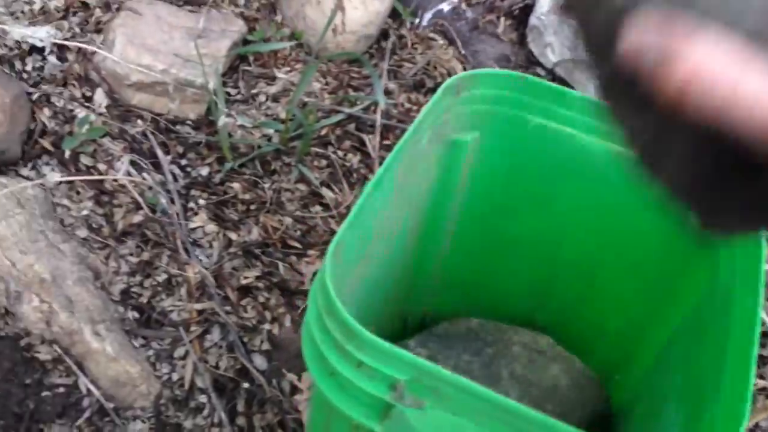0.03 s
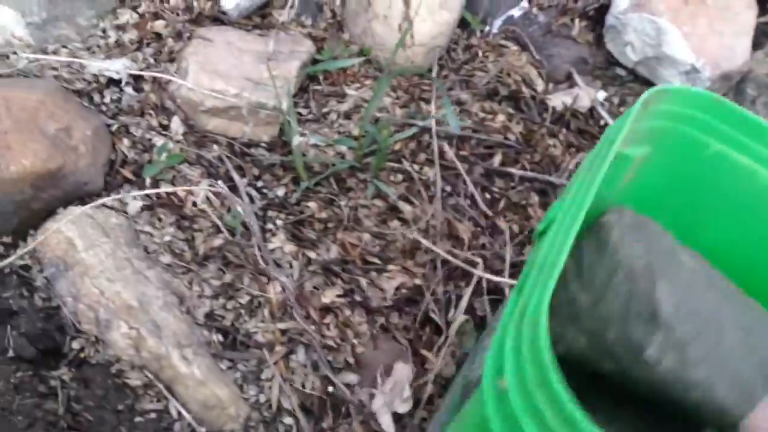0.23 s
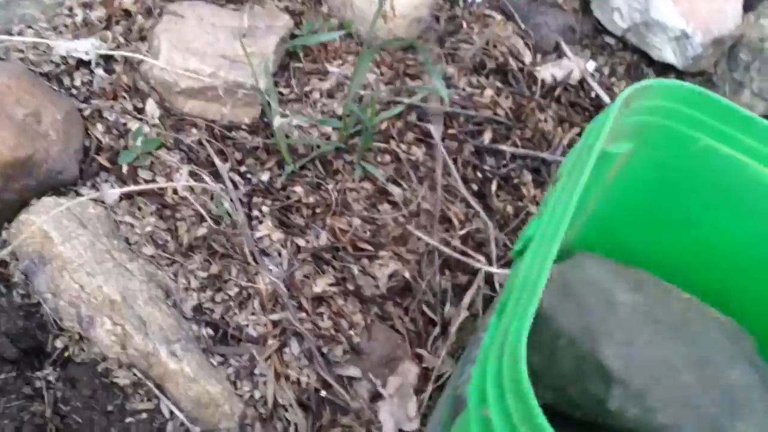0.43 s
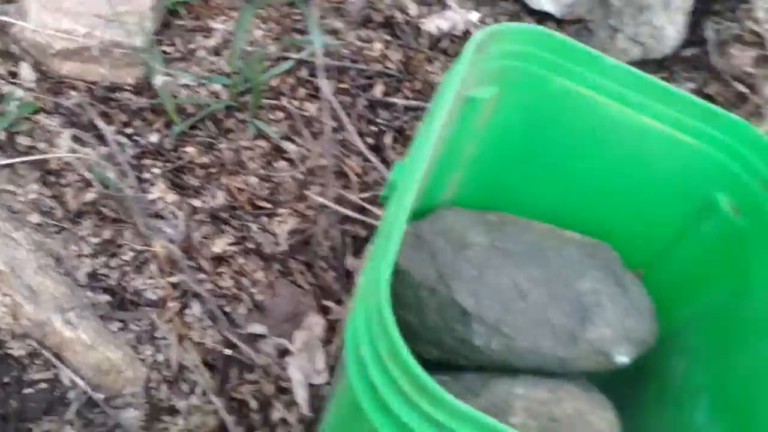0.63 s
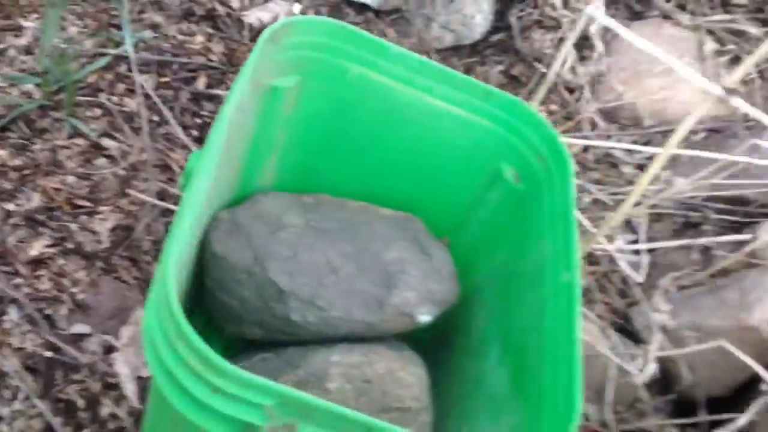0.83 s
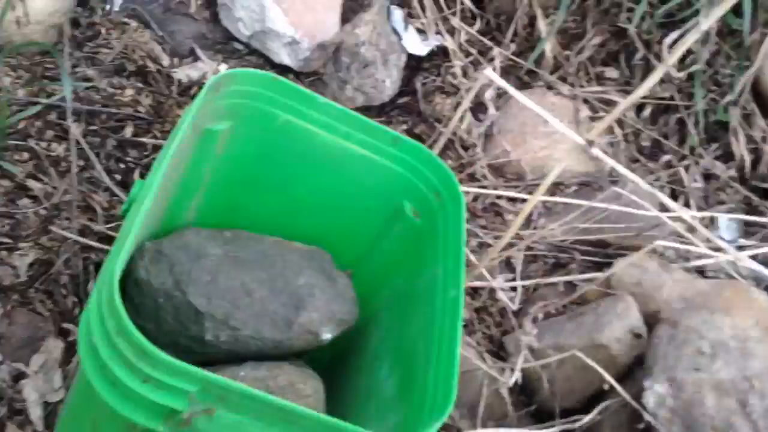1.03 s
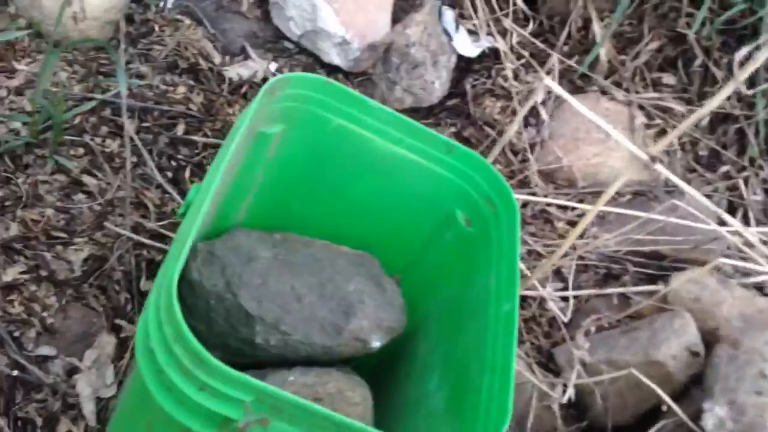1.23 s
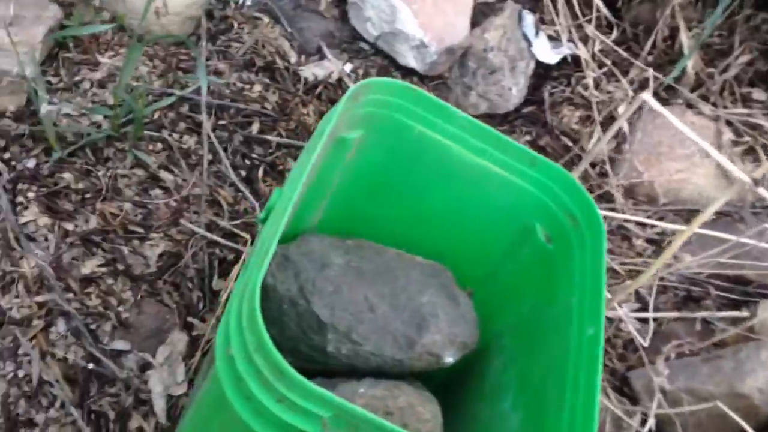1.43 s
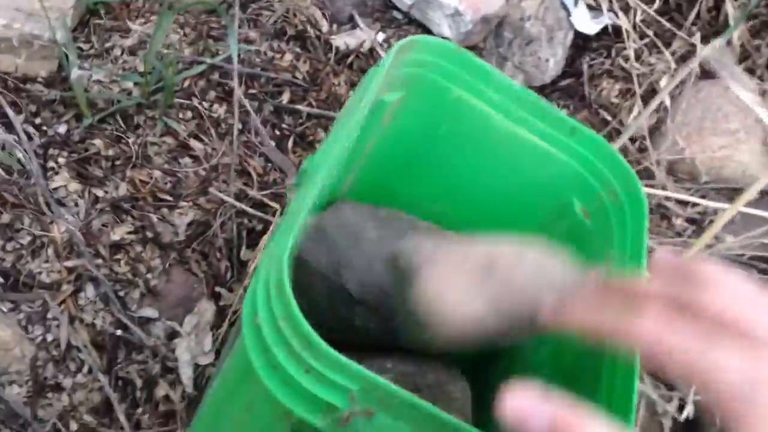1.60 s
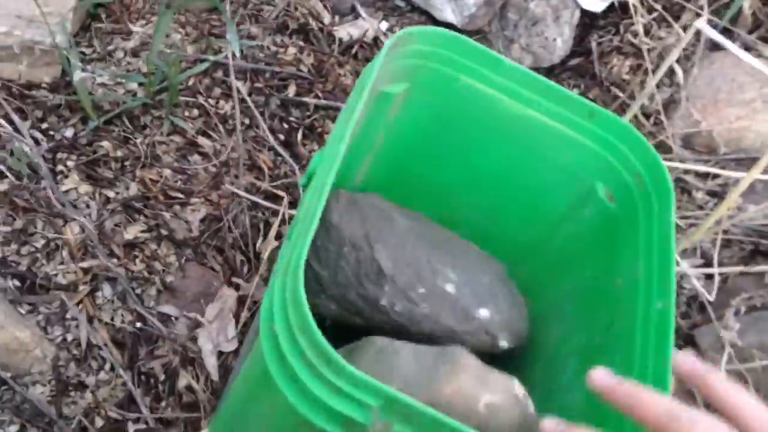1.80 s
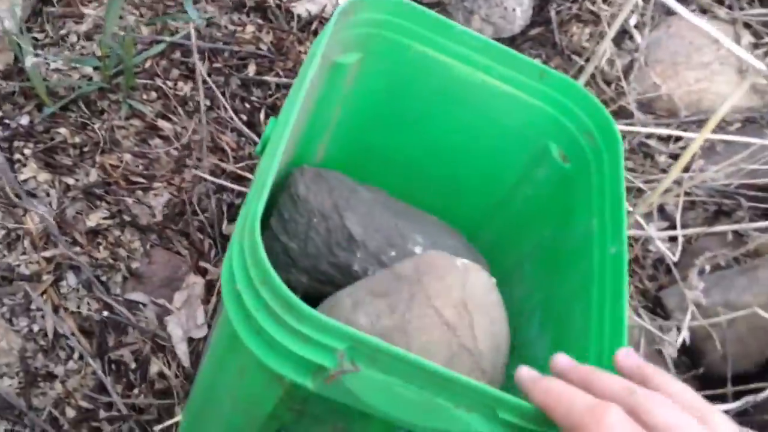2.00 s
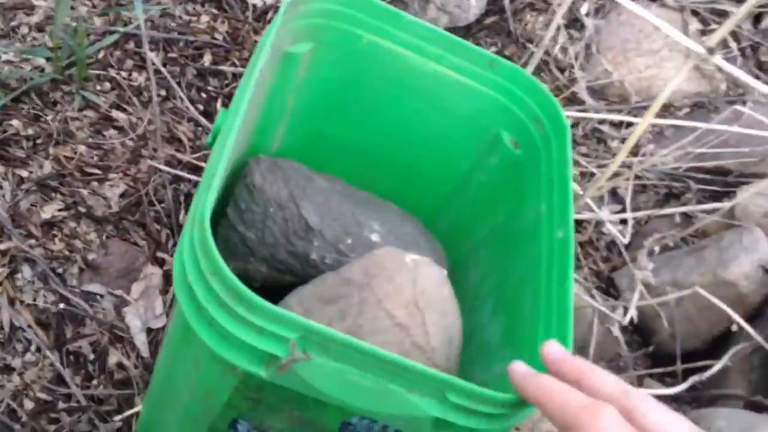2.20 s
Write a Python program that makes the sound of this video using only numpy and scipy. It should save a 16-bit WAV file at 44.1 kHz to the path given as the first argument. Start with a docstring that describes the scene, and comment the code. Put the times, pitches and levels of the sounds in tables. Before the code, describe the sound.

Two large rocks drop into a plastic bin one after the other. Each lands with hollow thumps, scrapes down the wall and clacks against other stones before settling. The sound is close, in quiet outdoor air.

```python
"""Two rocks into a plastic bin.

Two large rocks drop, one after the other, into a bin on leafy ground. Each lands with a cluster of
knocks, grinds down the wall, clacks against the other stones and settles. The hollow bin booms and
its walls ring; behind it is quiet outdoor air with a low rumble."""
import sys
import numpy as np
from scipy import signal
from scipy.fft import rfft, irfft
from scipy.io import wavfile

SR = 44100
rng = np.random.default_rng(int(sys.argv[2]) if len(sys.argv) > 2 else 0)


def to_wav(sig):
    """Store sig (one row per channel, or 1-D mono) as 16-bit WAV at the path in sys.argv[1].

    Samples outside -1..1 are clipped; the rate is SR.
    """
    pcm = np.clip(np.atleast_2d(sig), -1, 1) * 32767
    pcm = np.round(pcm).astype(np.int16)
    wavfile.write(sys.argv[1], SR, pcm.T)  # frames by channels


N = 103635
TIME_S = np.arange(N) / SR
HIT_S = np.arange(SR // 4) / SR  # time within one hit

# Outdoor air. Each row: frequency in Hz, relative spectral density in dB.
AIR_SPECTRUM = [(20, -11), (35, -15.5), (48, -10), (63, 2), (85, -7), (130, -15), (200, -23), (330, -22),
                (550, -20.5), (800, -29.5), (1300, -32.5), (2100, -31), (3000, -36), (8000, -38),
                (15000, -43)]
# Low rumble of the air. Each row: time in seconds, gain in dB.
AIR_SWELL = [(0, 3), (.12, -2), (.5, 0), (1.0, 1), (1.3, 2.5), (1.65, 1.5), (2.2, -5.5), (2.35, 0)]
# Rock swung over the bin. Each row: time in seconds, level in dB.
RUSTLE_LEVELS = [(0, -81), (.06, -63.5), (.13, -57), (0.198, -54.5), (0.262, -78.5), (1.45, -78),
                 (1.58, -62), (1.626, -47.5), (1.655, -61), (1.70, -62.5), (1.75, -85)]
# Dry rustle. Each row: frequency in Hz, gain in dB.
RUSTLE_SPECTRUM = [(200, -26), (1000, -9.5), (3000, -8), (7000, 0.5), (10000, 0.5), (13000, -3.5),
                   (16000, -7)]
# Rock contacts. Each row: start in seconds, hollow boom in dB, wall knock in dB, knock pitch in Hz,
# stone crack in dB, gritty tick in dB.
CONTACTS = [ (.068, -80, -88, 1000, -69, -54), (.193, -45, -42, 900, -65, -54),
            (0.2039, -30.5, -30.5, 600, -76, -88), (0.2165, -15, -14.5, 1047, -34.5, -24),
            (0.224, -26.5, -23.5, 996, -30, -30), (.235, -18, -16.5, 1400, -20, -38),
            (0.243, -20.5, -23.5, 1170, -55, -42.5), (0.2488, -19, -17, 1300, -29.5, -43),
            (.259, -15.5, -15.5, 1100, -29.5, -38), (0.2642, -18.5, -17, 1600, -28, -30.5),
            (0.271, -57, -20, 1300, -46.5, -44), (.280, -21.5, -19, 1600, -40.5, -51.5),
            (0.305, -33, -48, 1500, -46, -41), (.331, -44.5, -39, 1150, -61, -64),
            (.358, -31, -33.5, 1940, -40.5, -37.5), (.369, -30.5, -36.5, 980, -40, -60),
            (0.3763, -44, -37, 790, -38.5, -57), (.427, -34, -37, 1100, -37.5, -40),
            (0.46, -39.5, -44, 800, -41.5, -53), (.509, -54, -30, 1050, -48.5, -48),
            (0.521, -35.5, -30, 1040, -47, -46), (.555, -28.5, -34.5, 855, -45, -56),
            (.564, -29.5, -28, 969, -36, -43), (0.579, -29, -42, 1374, -36, -38.5),
            (0.587, -29, -59, 902, -52, -55), (0.596, -36, -59, 890, -49.5, -59),
            (0.602, -54, -61, 1500, -28, -27.5), (0.6044, -36.5, -27.5, 1700, -44.5, -26),
            (.622, -35.5, -38, 1000, -38.5, -50.5), (0.635, -38.5, -42.5, 990, -46, -46),
            (0.647, -44, -34.5, 1300, -36.5, -34.5), (0.691, -48, -47.5, 900, -50.5, -46.5),
            (0.7536, -53, -39.5, 1232, -32, -27), (0.797, -68, -48, 1152, -56, -55),
            (0.856, -77, -59.5, 1008, -68, -64), (0.9443, -56, -48.5, 806, -52.5, -42),
            (.977, -80.5, -53, 847, -69, -73.5), (0.989, -72, -58.5, 1190, -70, -70.5),
            (1.045, -70.5, -72.5, 1200, -76, -63), (1.380, -81.5, -61, 1980, -66.5, -70),
            (1.405, -72, -60.5, 1255, -66.5, -63.5), (1.530, -77, -63.5, 1802, -71.5, -69),
            (1.684, -56, -39, 980, -51.5, -56.5), (1.696, -47.5, -31.5, 883, -54, -64.5),
            (1.707, -28, -13.5, 892, -25.5, -33.5), (1.7121, -27.5, -26.5, 900, -31.5, -25.5),
            (1.723, -21, -20, 958, -23.5, -34.5), (1.737, -15, -23, 886, -27.5, -39.5),
            (1.747, -22.5, -29, 960, -27, -53), (1.758, -27.5, -21, 980, -28, -29.5),
            (1.781, -49, -25.5, 1160, -30, -52), (1.789, -45, -54, 980, -42, -60),
            (1.807, -32.5, -31, 940, -53, -42), (1.845, -41.5, -41, 1320, -42, -38.5),
            (1.899, -35.5, -36.5, 740, -42.5, -35.5), (1.9065, -50, -59, 920, -40.5, -45),
            (1.915, -43, -44, 900, -49, -38), (1.9411, -55, -42, 1300, -45.5, -47),
            (1.969, -38, -32.5, 1010, -66, -56), (1.978, -69, -66, 1190, -56, -38),
            (1.9846, -44, -40, 1010, -33, -30), (2.0097, -33, -29.5, 1130, -26.5, -23.5),
            (2.021, -34.5, -39.5, 960, -47, -28), (2.031, -39, -44, 980, -40, -32),
            (2.042, -33.5, -38.5, 910, -55, -33), (2.128, -46.5, -40.5, 1370, -45.5, -48.5),
            (2.238, -64, -73, 1487, -58.5, -44.5)]
# Hollow and floor of the bin. Each row: frequency in Hz, level in dB, T60 in seconds.
HOLLOW_MODES = [(100, -10, 0.12), (151.4, -3.5, .12), (194.3, -1, 0.24), (236.3, -5, .09), (265, -1, 0.078),
                (328, -0.5, .09), (350, 0, 0.037), (387.6, 2.5, 0.094), (456, -2.5, 0.06), (499, -9, 0.052),
                (598.5, -7.5, 0.051)]
# Bin walls. Each row: frequency in Hz, level in dB, T60 in seconds.
WALL_MODES = [(708.5, 7, 0.038), (798.4, 2.5, 0.054), (874, -2.5, .08), (1039.8, 4, 0.044),
              (1285, -1, 0.054), (1373, -11.5, .13), (1654, -8.5, 0.088), (1797, -5, .11),
              (2166, 0.5, 0.071), (2443, -3.5, .09)]
# Gritty tick. Each row: frequency in Hz, gain in dB.
TICK_SPECTRUM = [(300, -38.5), (2500, -14), (5000, -9), (7000, 2.5), (10000, 1), (13000, -2.5), (16000, -1)]
# Stone sliding on plastic. Each row: time in seconds, grit in dB, bin rumble in dB.
SLIDE_LEVELS = [(0, -74, -80.5), (0.202, -63.5, -66), (0.227, -29, -38.5), (.3, -37.5, -45.5),
                (0.348, -47.5, -69.5), (.37, -43.5, -38), (.44, -43.5, -35), (.49, -44.5, -47),
                (.54, -41, -31.5), (.62, -45, -34), (.68, -49, -52), (0.746, -53.5, -54.5), (.83, -64, -70),
                (.93, -64.5, -81.5), (1.1, -74.5, -75), (1.3, -86, -82), (1.5, -68.5, -83.5),
                (1.661, -68.5, -69.5), (1.702, -61.5, -67.5), (1.72, -31, -27), (1.78, -37, -27.5),
                (1.84, -39, -38), (1.91, -43, -40.5), (1.96, -49.5, -43.5), (2.051, -41.5, -43.5),
                (2.081, -55, -50), (2.12, -60, -60.5), (2.15, -55.5, -51), (2.25, -57.5, -69),
                (2.35, -66.5, -66)]
# Grit on the wall. Each row: frequency in Hz, gain in dB.
GRIT_SPECTRUM = [(200, -20.5), (1000, 2.5), (2500, 2), (4500, 0), (8000, -1), (12000, -1.5), (16000, -10)]
# Bin shaken by slips. Each row: frequency in Hz, gain in dB.
RUMBLE_SPECTRUM = [(20, -19), (80, -13), (190, -0.5), (270, 2), (380, 1), (550, -13.5), (850, -4),
                   (1300, -9.5), (2500, -18), (8000, -45)]
# Rock's weight pushing the bin down. Each row: start in seconds, level in dB.
WEIGHT_THUDS = [(0.2062, -22.5), (0.217, -25.5), (0.399, -45), (0.429, -44), (.578, -52.5), (0.605, -42.5),
                (1.696, -29.5), (1.725, -37.5), (2.009, -41)]
# Stone on stone. Each row: start in seconds, lower ring in Hz, its level in dB, upper ring in Hz,
# its level in dB, T60 in seconds.
STONE_CLACKS = [(0.234, 1580, -34, 4590, -24.5, 0.015), (0.577, 3144, -30.5, 3960, -35, 0.037),
                (0.6041, 1640, -30.5, 9460, -27, 0.019), (.7543, 1200, -37, 2340, -28.5, 0.018),
                (0.7555, 3710, -36, 9730, -34, 0.014), (0.945, 754, -42, 1703, -46.5, 0.051),
                (1.707, 1733, -29, 2510, -28, 0.021), (1.781, 2000, -31, 3680, -41, .025),
                (1.9845, 2227, -44.5, 3713, -39, 0.026), (2.0106, 3900, -31.5, 6980, -36, 0.042)]


def amp(db):
    return 10 ** (np.asarray(db) / 20)


def unit_rms(x):
    return x / np.sqrt(np.mean(x ** 2) + 1e-20)


def unit_hit(x, onset_s=.009):
    """Scale to RMS 1 over the onset."""
    return x / np.sqrt(np.mean(x[:round(onset_s * SR)] ** 2) + 1e-20)


def decay(t60_s):
    return amp(-60 * HIT_S / t60_s)


def envelope(times_s, levels_db):
    return amp(np.interp(TIME_S, times_s, levels_db))


def add(mix, start_s, sound):
    part = mix[round(start_s * SR):][:len(sound)]
    part += sound[:len(part)]


def butter(x, kind, hz, order):
    return signal.sosfilt(signal.butter(order, hz, kind, fs=SR, output="sos"), x)


def band(x, hz, q):
    """Two passes of a resonator, each at half of q."""
    b, a = signal.iirpeak(hz, q / 2, fs=SR)
    return signal.lfilter(b, a, signal.lfilter(b, a, x))


def colour(x, spectrum, fft_size=4096):
    """Minimum-phase filter through (Hz, dB) points."""
    hz, db = np.transpose(spectrum)
    bins_hz = abs(np.fft.fftfreq(fft_size, 1 / SR))
    log_gain = np.log(amp(np.interp(np.log(bins_hz + 1), np.log(hz), db)))
    response = np.exp(np.conj(signal.hilbert(log_gain)))
    taps = np.fft.ifft(response).real[:fft_size // 2]
    return signal.fftconvolve(x, taps)[:len(x)]


def air(level_db=-63.5, swell_below_hz=130):
    """Faint outdoor hiss over a low rumble that swells and ebbs."""
    hz, db = np.transpose(AIR_SPECTRUM)
    bins_hz = np.fft.rfftfreq(N, 1 / SR)
    gain = amp(np.interp(np.log(bins_hz + 1), np.log(hz + 1), db))
    wash = unit_rms(irfft(rfft(rng.standard_normal(N)) * gain, N))
    low = irfft(rfft(wash) * (bins_hz < swell_below_hz), N)
    return amp(level_db) * (wash - low + low * envelope(*np.transpose(AIR_SWELL)))


def grains(per_s, spread_db=4.5):
    """Random clicks of uneven size."""
    size = amp(spread_db * np.minimum(rng.exponential(1, N), 4))
    return size * rng.choice([-1, 1], N) * (rng.random(N) < per_s / SR)


def scratch(grain_s=.0022, depth=.56):
    """Noise that flares at every grain."""
    pole = np.exp(-1 / (grain_s * SR))
    energy = signal.lfilter([1], [1, -pole], grains(per_s=5000) ** 2)
    return unit_rms(energy ** depth) * rng.standard_normal(N)


def rustle():
    """Soft, bright brushing as each rock is swung over the bin."""
    return envelope(*np.transpose(RUSTLE_LEVELS)) * unit_rms(colour(scratch(), RUSTLE_SPECTRUM))


def ring(modes, spread_db=1.5):
    """Modes struck at a random spot, each with its own strength and sign."""
    hz, db, t60_s = np.transpose(modes)[:, :, None]
    strength = amp(db + spread_db * rng.standard_normal(hz.shape))
    sign = rng.choice([-1, 1], hz.shape)
    return (sign * strength * decay(t60_s) * np.sin(2 * np.pi * hz * HIT_S)).sum(0)


def burst(t60_s, tail_db=-23.5, tail_t60_s=.15):
    """Dense, quickly damped vibration with a faint tail inside the bin."""
    return rng.standard_normal(len(HIT_S)) * (decay(t60_s) + amp(tail_db) * decay(tail_t60_s))


def wall_knock(hz, ring_db=-15, dent_db=-2, dent_rise_s=.00036):
    """The wall dents under the rock, swings back within a few cycles and rings."""
    wall = band(burst(t60_s=.047) + amp(ring_db) * ring(WALL_MODES), hz, q=1.3)
    wall = butter(wall, "highpass", hz=556, order=4)
    wall = butter(wall, "lowpass", hz=1.61 * hz, order=4)
    rise = 1 - np.exp(-HIT_S / dent_rise_s)
    dent = np.sin(2 * np.pi * hz * HIT_S) * rise * decay(t60_s=.013)
    return unit_hit(wall) + amp(dent_db) * rng.choice([-1, 1]) * unit_hit(dent)


def hollow_boom(free_share=.5, damping_t60_s=.095):
    """The rock's weight damps part of the hollow's ring; the rest dies freely."""
    hollow = butter(ring(HOLLOW_MODES), "highpass", hz=80, order=2)
    return hollow * (free_share + (1 - free_share) * decay(damping_t60_s))


def knocks():
    """Each contact knocks the wall, cracks on the stone, ticks on grit and booms the hollow."""
    out = np.zeros(N)
    for start_s, boom_db, knock_db, knock_hz, crack_db, tick_db in CONTACTS:
        knock = wall_knock(knock_hz)
        crack = band(burst(t60_s=.031), hz=3500, q=1.6)
        tick = colour(burst(t60_s=.022), TICK_SPECTRUM)
        boom = hollow_boom()
        for sound, db in (knock, knock_db), (crack, crack_db), (tick, tick_db), (boom, boom_db):
            add(out, start_s, amp(db) * unit_hit(sound))
    return out


def slide(ring_gain=.33):
    """Grit scratches along the wall while small slips shake the bin."""
    times_s, grit_db, rumble_db = np.transpose(SLIDE_LEVELS)
    grit = unit_rms(colour(scratch(), GRIT_SPECTRUM))
    slips = grains(per_s=700)
    ringing = signal.fftconvolve(slips, ring(HOLLOW_MODES) + .5 * ring(WALL_MODES))[:N]
    shaking = colour(slips, RUMBLE_SPECTRUM)
    rumble = unit_rms(unit_rms(shaking) + ring_gain * unit_rms(ringing))
    return envelope(times_s, grit_db) * grit + envelope(times_s, rumble_db) * rumble


def crumbs(per_s=41, above_grit_db=3.52):
    """Loose grains snap under the sliding stone."""
    snaps = np.zeros(N)
    times_s, grit_db, _ = np.transpose(SLIDE_LEVELS)
    for start_s in TIME_S[rng.random(N) < per_s / SR]:
        level_db = np.interp(start_s, times_s, grit_db) + above_grit_db
        add(snaps, start_s, amp(level_db) * decay(t60_s=.012))
    return snaps * unit_rms(colour(rng.standard_normal(N), TICK_SPECTRUM))


def thuds(hz=55.6, decay_s=.011):
    """A short, low push as the bin takes the weight."""
    out = np.zeros(N)
    push = unit_hit(np.sin(2 * np.pi * hz * HIT_S) * np.exp(-HIT_S / decay_s))
    for start_s, db in WEIGHT_THUDS:
        add(out, start_s, amp(db) * push)
    return out


def clacks(neighbour_ratio=1.06, neighbour_db=-9, grit_db=-7):
    """Stone meets stone: two short, gritty rings, each with a weaker close neighbour."""
    out = np.zeros(N)
    for start_s, low_hz, low_db, high_hz, high_db, t60_s in STONE_CLACKS:
        for hz, db in (low_hz, low_db), (high_hz, high_db):
            pair = unit_hit(ring([(hz, 0, t60_s), (hz * neighbour_ratio, neighbour_db, t60_s)]))
            grit = unit_hit(band(burst(t60_s), hz, q=12))
            add(out, start_s, amp(db) * unit_hit(pair + amp(grit_db) * grit))
    return out


def scene():
    """Mono mix with a low cut."""
    mix = knocks() + clacks() + thuds() + slide() + crumbs() + rustle() + air()
    return butter(mix, "highpass", hz=53, order=1)[None]


def record(dry, ceiling=.8, cutoff_hz=15400):
    """Soft clip, then low-pass."""
    rounded = dry / (1 + (dry / ceiling) ** 4) ** (1 / 4)
    taps = signal.firwin(255, cutoff_hz, window=("kaiser", 9), fs=SR)
    return signal.oaconvolve(rounded, taps[None], "same")


dry = scene()
out = record(dry)
to_wav(out)
```